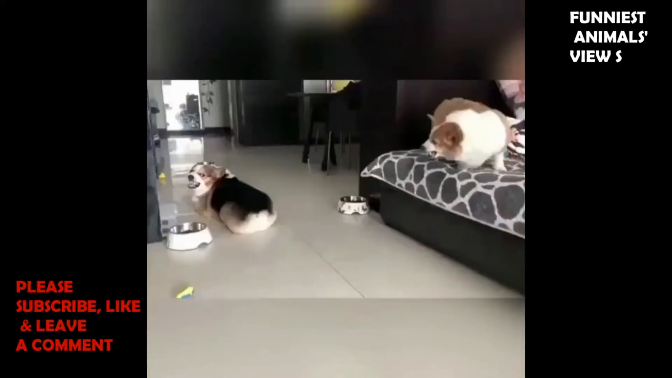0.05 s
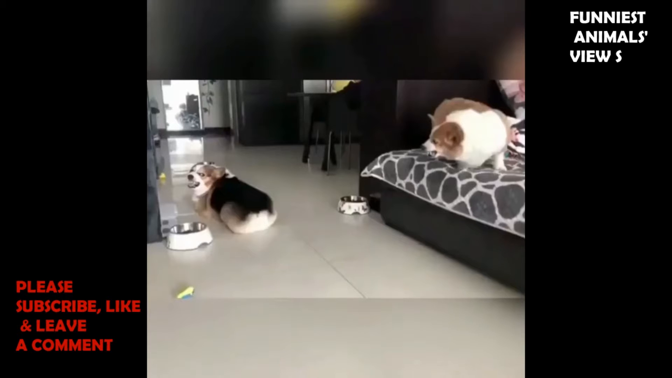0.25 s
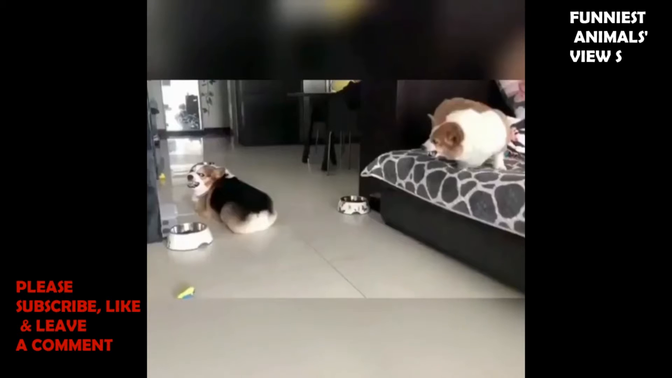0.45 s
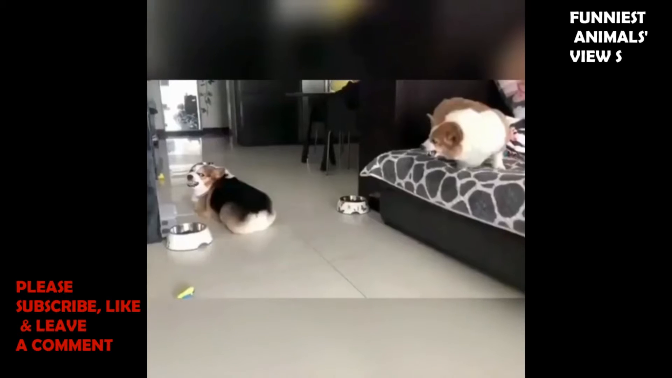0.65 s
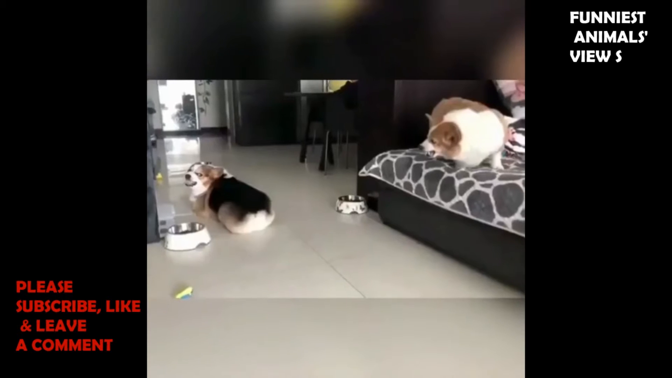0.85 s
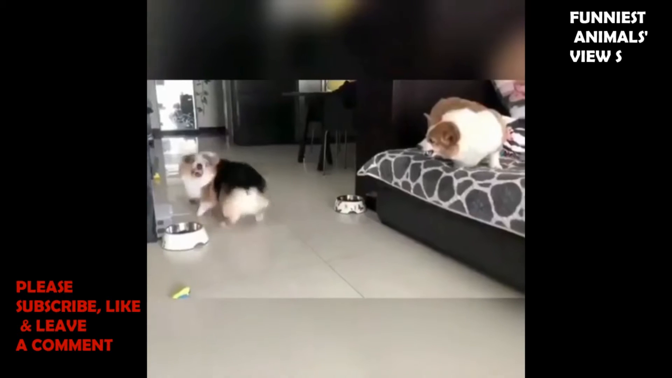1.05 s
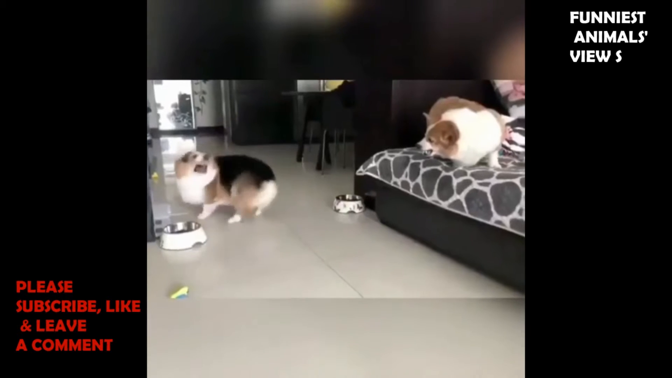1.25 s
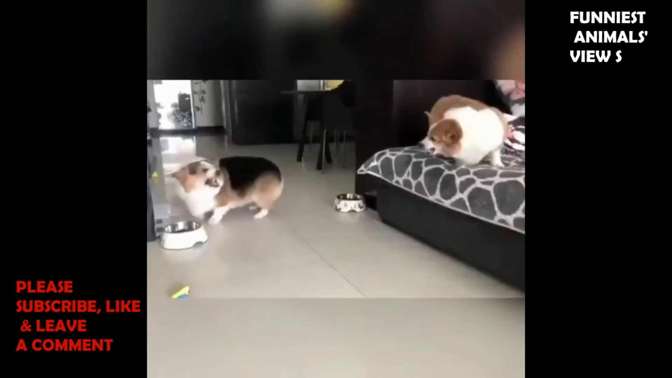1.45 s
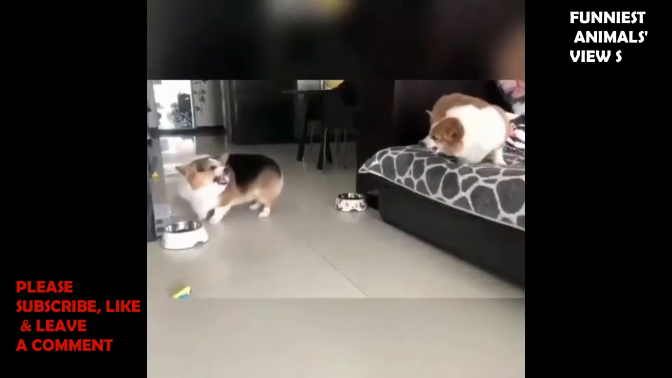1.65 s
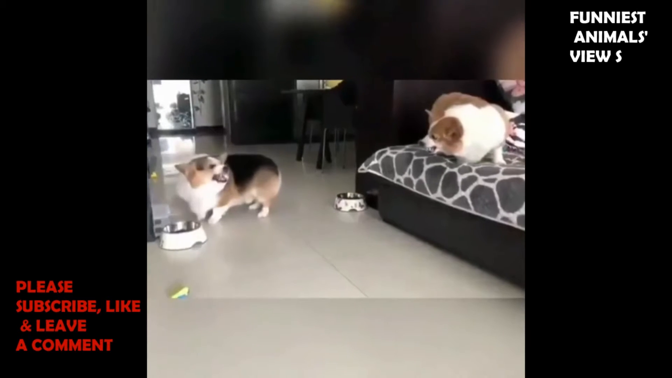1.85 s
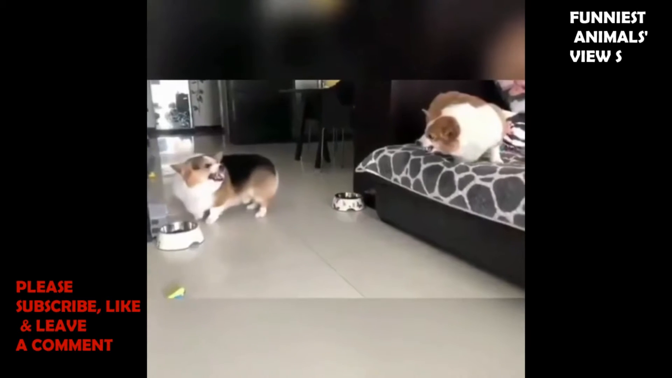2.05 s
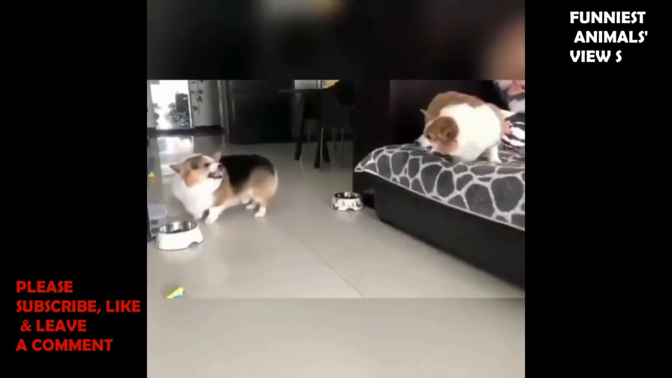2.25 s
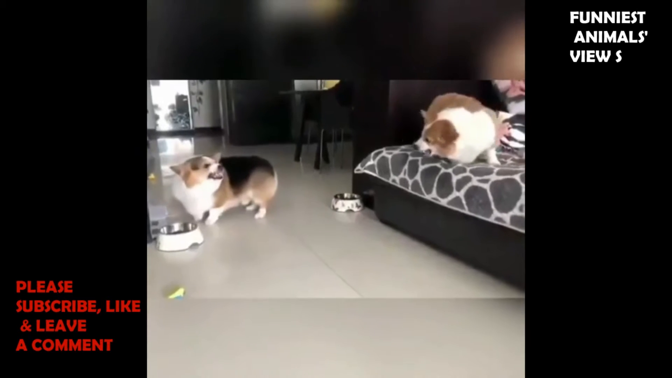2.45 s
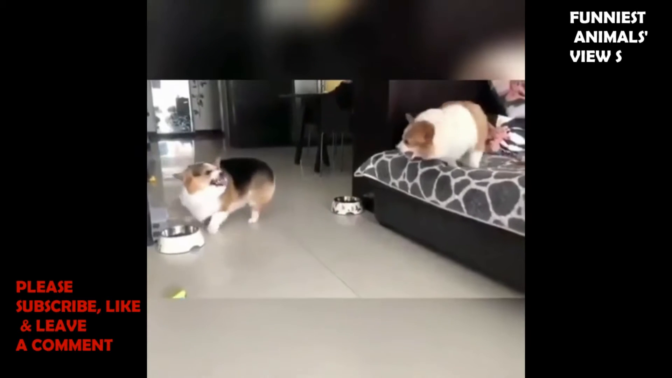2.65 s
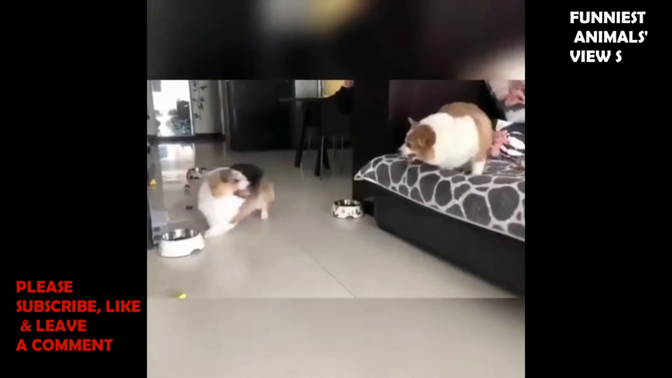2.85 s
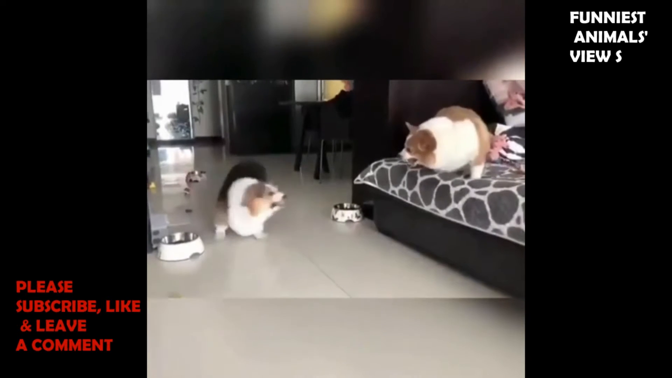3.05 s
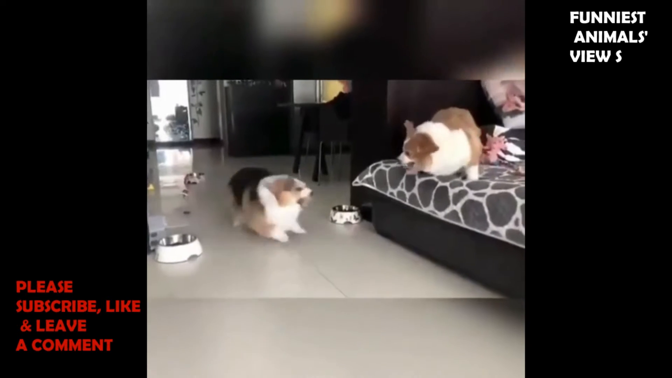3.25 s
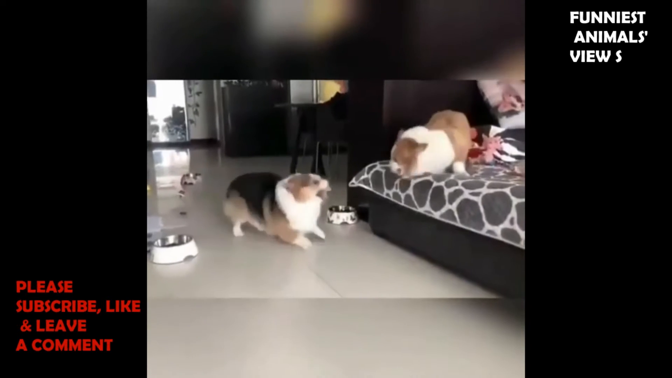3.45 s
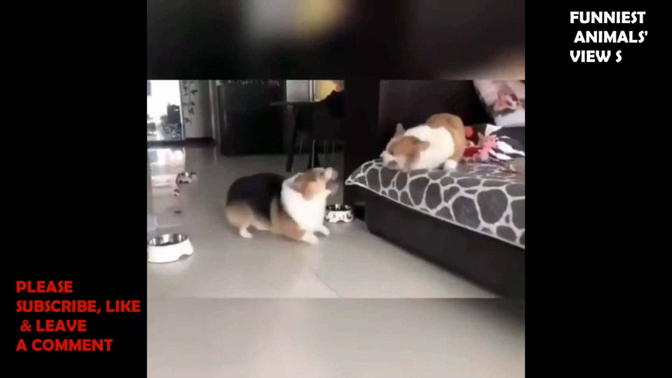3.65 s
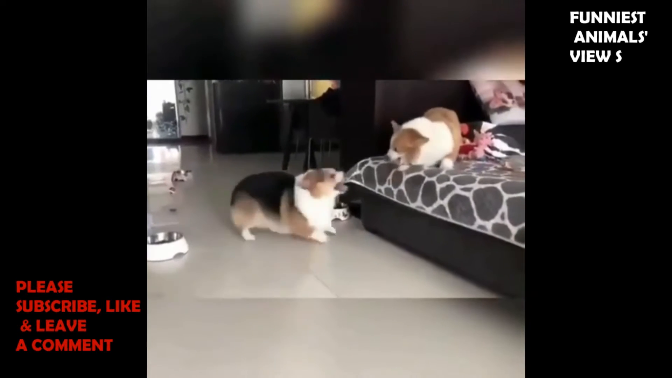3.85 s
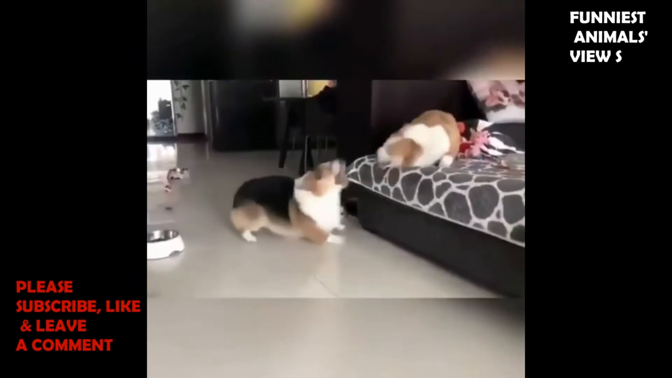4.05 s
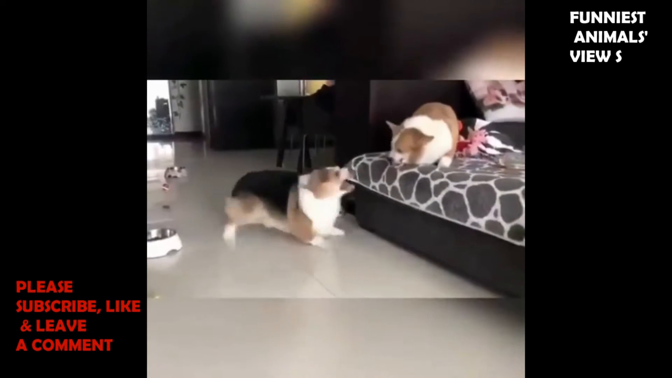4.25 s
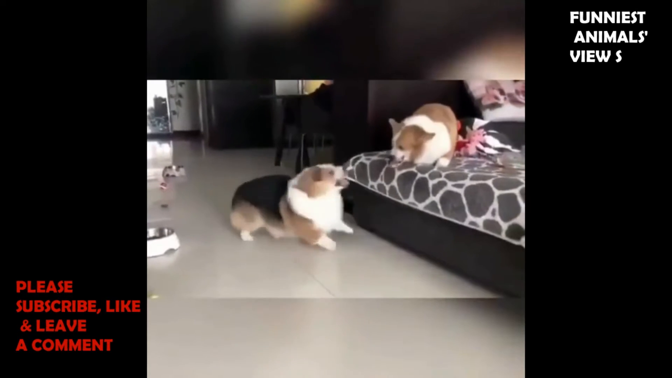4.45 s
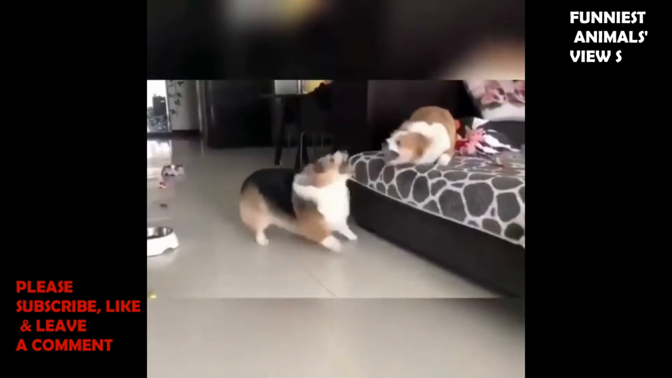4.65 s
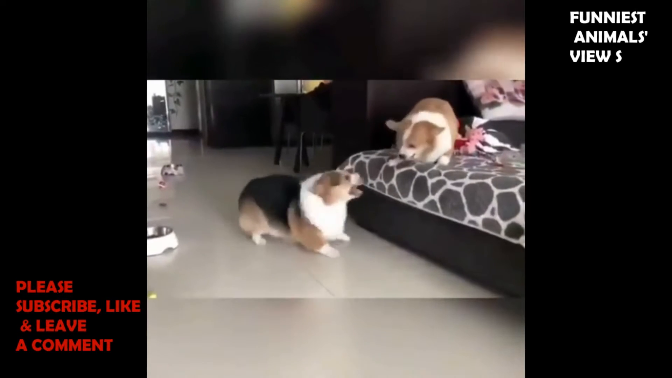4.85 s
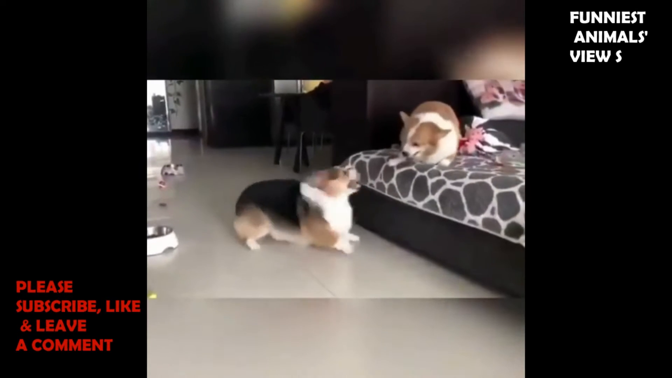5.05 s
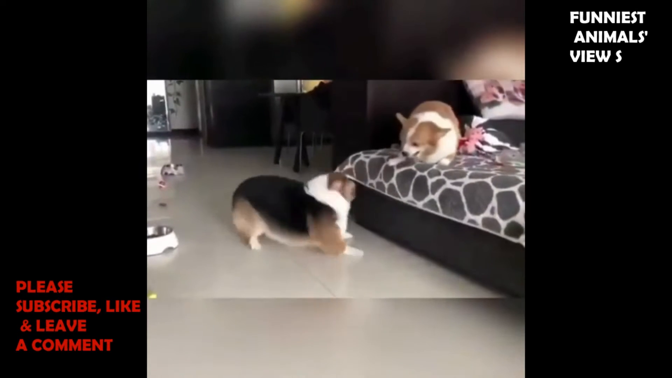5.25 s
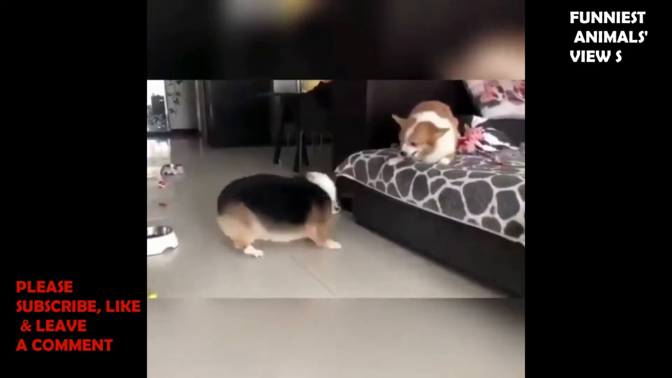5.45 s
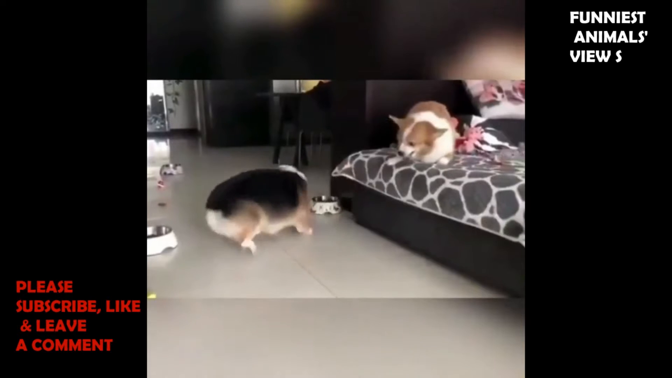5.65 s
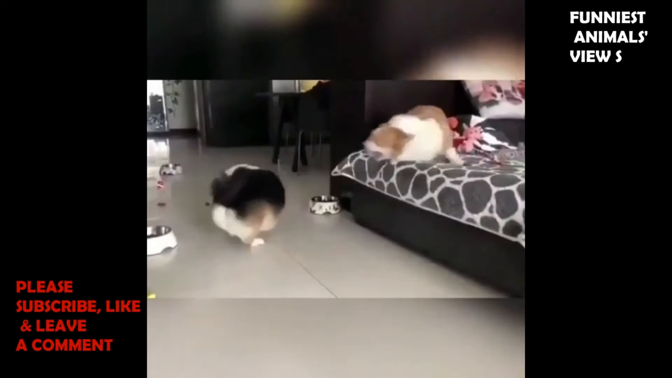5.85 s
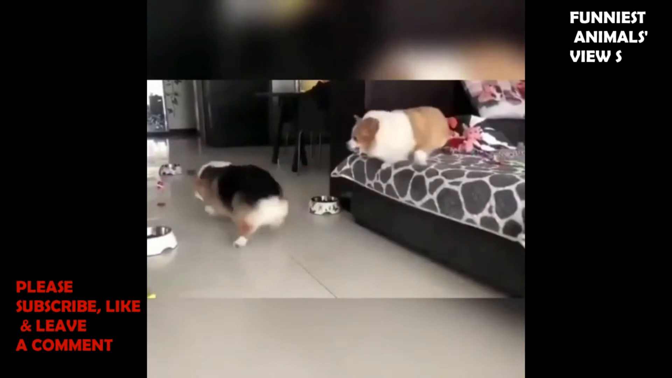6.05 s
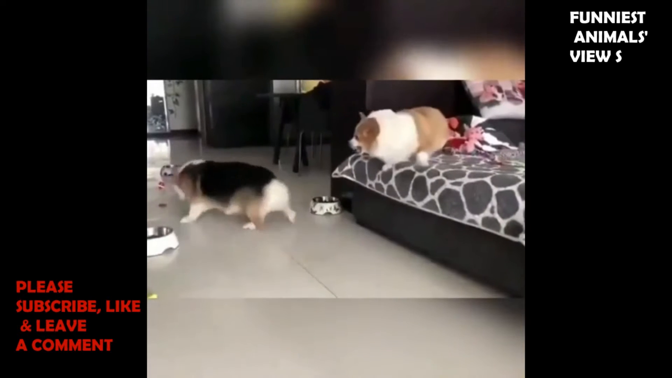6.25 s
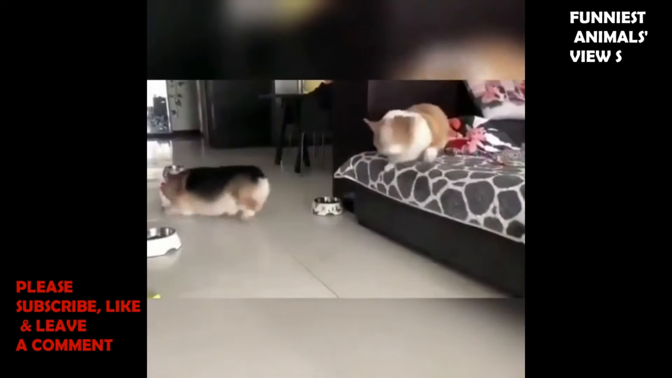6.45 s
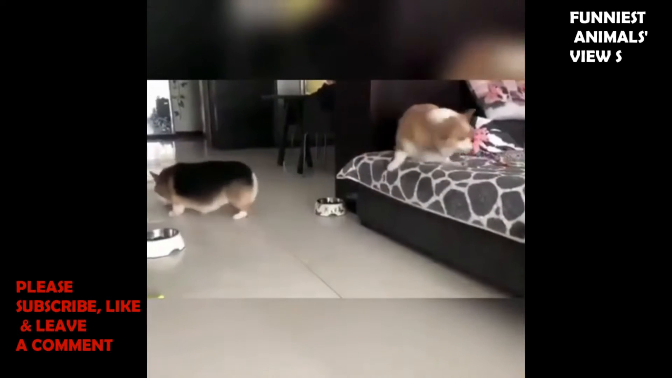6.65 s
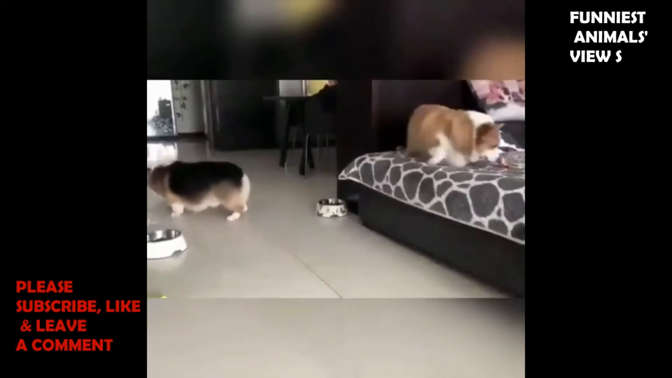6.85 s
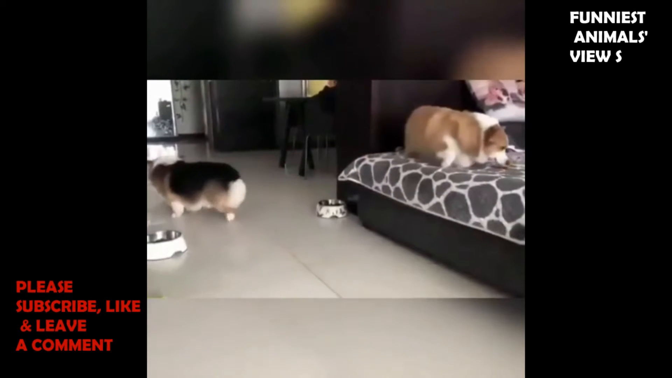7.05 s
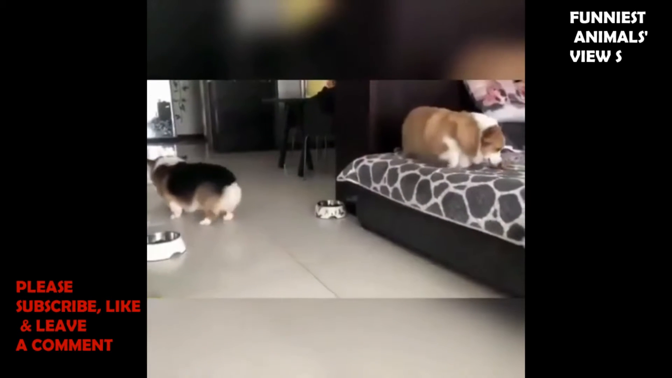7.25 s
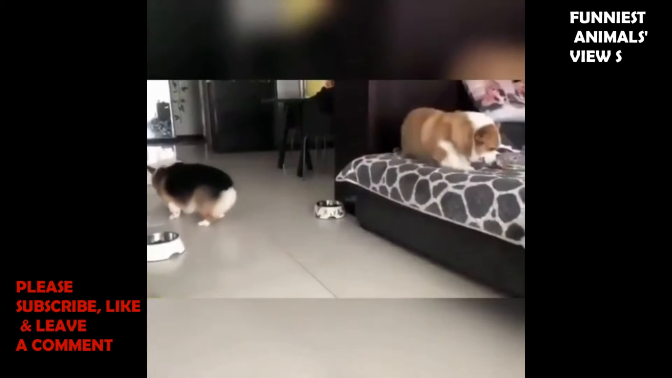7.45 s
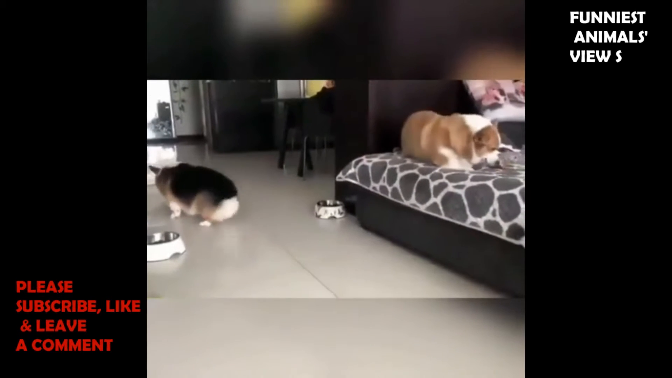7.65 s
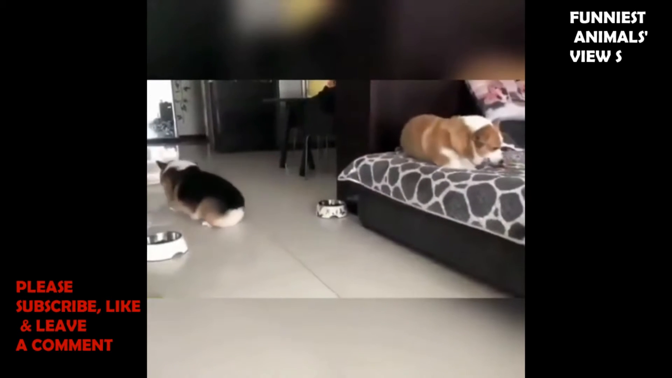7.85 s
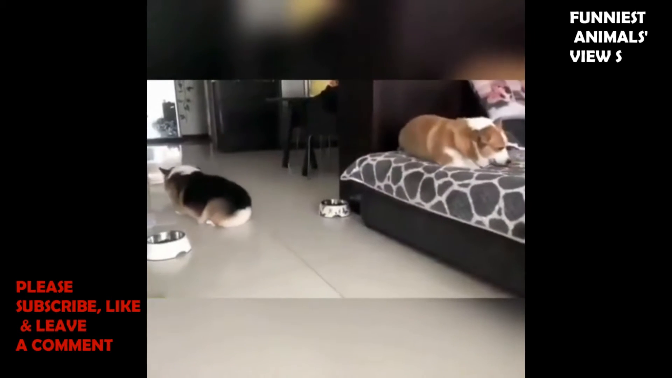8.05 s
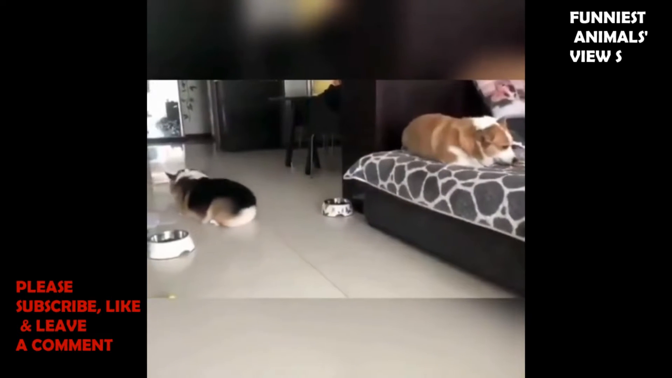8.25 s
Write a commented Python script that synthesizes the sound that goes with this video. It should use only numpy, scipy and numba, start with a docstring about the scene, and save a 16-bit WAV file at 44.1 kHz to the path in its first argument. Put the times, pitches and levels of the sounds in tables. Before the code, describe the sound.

After a low, rattling growl, two corgi-sized dogs quarrel with hoarse barks and snaps, claws scrabbling on tiles in a hard, echoing room.

```python
"""Two corgis quarrel in a hard tiled room: after a short silence, a low growl of slow flaps runs on until
about 7 s, over quiet air with a faint hum. From 1.15 s ten hoarse barks and snaps burst out: rough fold pulses
ringing through throat resonances. Huffs and rasps are resonant noise; grainy paw scuffs and claw ticks
thicken from 3.15 s. Two soft woofs follow, the last at 7.1 s. Reflections and a tail set each source in the room.
At the microphone the treble differs between left and right, and the phone's limiter holds the barks down."""
import sys
import numpy as np
from scipy import signal
from scipy.fft import rfft, irfft, next_fast_len
from scipy.io import wavfile
from scipy.ndimage import uniform_filter1d, minimum_filter1d
from numba import njit

SR = 44100
rng = np.random.default_rng(int(sys.argv[2]) if len(sys.argv) > 2 else 0)


def wrap_up_sound(samples):
    """Save the sound to the file named by the first command line argument, as 16-bit audio."""
    columns = np.atleast_2d(samples).T
    # keep every value between -1 and 1, then stretch to whole-number steps
    tamed = np.clip(columns, -1, 1)
    steps = np.round(tamed * 32767).astype(np.int16)
    wavfile.write(sys.argv[1], SR, steps)


N = 366471
TIME = np.arange(N) / SR


def undb(db):
    """Decibels to gain."""
    return 10 ** (np.asarray(db) / 20)


def unit(x):
    """Scale to rms 1."""
    return x / np.sqrt(np.mean(x ** 2))


def even(x, span_s):
    """Hold the rms near 1 over span_s, keeping the faster grain."""
    size = max(int(span_s * SR), 8)
    power = uniform_filter1d(uniform_filter1d(x ** 2, size), size)
    return x / np.sqrt(np.abs(power) + 1e-14)


def curves(rows, t):
    """The columns of a table at times t, drawn as straight lines from row to row."""
    s, *columns = np.transpose(rows)
    return [np.interp(t, s, c) for c in columns]


def wobble(n, rate_hz):
    """Smooth random motion of spread near 1, with rate_hz new targets a second."""
    at = np.arange(n) * rate_hz / SR
    return 1.2 * np.interp(at, np.arange(n), rng.standard_normal(n))


def swell(t, length_s, attack_s, release_s, fade_db):
    """Attack, a hold that fades by about fade_db, release."""
    rise = np.sin(np.pi / 2 * np.clip(t / attack_s, 0, 1)) ** 2
    fall = np.clip((length_s - t) / release_s, 0, 1)
    return rise * fall * undb(-fade_db * np.clip((t - attack_s) / length_s, 0, 1))


def colour(x, points):
    """Shape a sound by (Hz, dB) points; rms 1."""
    hz, db = np.transpose(points)
    size = next_fast_len(len(x))
    f = np.maximum(np.fft.rfftfreq(size, 1 / SR), 1)
    gain = undb(np.interp(np.log(f), np.log(hz), db))
    return unit(irfft(rfft(x, size) * gain, size)[:len(x)])


@njit
def svf(x, hz, width):
    """State-variable band-pass with moving centre and width."""
    y, b, l = np.empty(len(x)), 0., 0.
    for i in range(len(x)):
        g, k = np.tan(np.pi * hz[i] / SR), width[i] / hz[i]
        v = (b + g * (x[i] - l) + 1e-18) / (1 + g * (g + k))
        b, l, y[i] = 2 * v - b, l + 2 * g * v, k * v
    return y


def resonate(x, hz, width):
    """A steep resonance: the band-pass twice."""
    hz, width = hz * np.ones(len(x)), width * np.ones(len(x))
    return svf(svf(x, hz, width), hz, width)


def add(out, s, x):
    """Mix x into out from time s."""
    i = int(s * SR)
    out[i:i + len(x)] += x[:N - i]


# bands that waver in hisses and scuffs: centre_hz
TREBLE_BANDS = (3500, 6500, 10500)


def restless(x, drift_db=2.5, rate_hz=25):
    """Let the treble bands of a scrape or hiss rise and fall on their own."""
    drifts = [resonate(x, hz, hz / 2) * (undb(drift_db * wobble(len(x), rate_hz)) - 1) for hz in TREBLE_BANDS]
    return x + sum(drifts)


# decay of the tiled room: band_hz, time_to_fall_60_db_s
ROOM_DECAY = [(150, 0.57), (500, 0.53), (1400, 0.49), (3700, 0.62), (10000, 0.37)]


def room(x, wet_db, early_db=-6, early_s=0.0062, build_s=0.0096):
    """Direct sound, quick reflections off floor and walls, and a diffuse tail; more wet_db sits deeper."""
    t = TIME[:SR]
    f, s, bins = signal.stft(rng.standard_normal(SR), SR, nperseg=256)
    hz, t60 = np.transpose(ROOM_DECAY)
    t60_at_f = np.interp(np.log(f + 1), np.log(hz), t60)[:, None]
    decay = np.exp(-np.log(1000) * s / t60_at_f)
    tail = signal.istft(bins * decay)[1][:SR] * (1 - np.exp(-t / build_s))
    early = rng.standard_normal(SR) * (rng.random(SR) < .02) * np.exp(-t / early_s)
    response = (undb(wet_db) * unit(tail) + undb(early_db) * unit(early)) / np.sqrt(SR)
    response[0] += 1  # direct sound
    return signal.fftconvolve(x, response / np.linalg.norm(response))[:N]  # response keeps unit energy


# spectrum of the room air: band_hz, gain_db
AIR_COLOUR = [(30, -16.5), (65, 3.5), (110, -2), (160, -3), (260, 0.5), (400, -7), (800, -11.5),
              (1300, -11), (2000, -19), (4000, -29), (8000, -35.5), (13000, -43)]
# steady hum tones: pitch_hz, level_db
HUM_TONES = [(60, -68), (100, -70), (276, -68)]
AIR_DB = -54


def background():
    """Quiet room air, shaped noise whose level drifts slightly, with a faint hum of steady sines."""
    hum = sum(undb(db) * unit(np.sin(2 * np.pi * hz * TIME)) for hz, db in HUM_TONES)
    air = colour(rng.standard_normal(N), AIR_COLOUR)
    return air * undb(AIR_DB + wobble(N, 7.8)) + hum


# paws scuffing on the tiles: start_s, length_s, level_db
PAW_SCUFFS = [(.3, .12, -67), (.68, 0.8, -60.5), (1.917, 0.12, -62), (2.265, .07, -64.5),
              (3.18, 0.19, -47.5), (3.443, 0.17, -41), (3.566, 0.28, -41), (3.843, 0.16, -52.5),
              (3.957, 0.05, -30), (4.07, 0.14, -37.5), (4.234, 0.15, -39), (4.381, 0.24, -41),
              (4.645, 0.25, -44.5), (4.805, 0.18, -37.5), (5.065, 0.18, -42.5), (5.226, 0.13, -43.5),
              (5.432, 0.15, -50.5), (5.608, 0.2, -44.5), (5.704, 0.23, -47), (6.015, 0.09, -33.5),
              (6.12, 0.19, -39.5), (6.367, 0.092, -50.5), (6.617, 0.14, -43.5), (7.07, 0.19, -48.5)]
# single claw ticks: start_s, level_db (at the onset)
CLAW_TICKS = [(3.694, -27), (4.49, -25.5), (4.5744, -39.5), (5.097, -26.5), (5.308, -26), (5.512, -32),
              (5.9409, -36.5), (6.3748, -34.5), (6.5105, -31)]
# spectrum of scuffs and ticks: band_hz, gain_db
TILE_COLOUR = [(1500, -14.5), (3500, 6.5), (5500, 2), (8000, -1), (11000, -4.5), (13000, -7.5)]
# light footwork between the scuffs: start_s, end_s
SHUFFLE_SPAN = (3.15, 7.0)
SHUFFLE_DB = -59.5
SCUFF_ATTACK_S, SCUFF_RELEASE_S, SCUFF_FADE_DB = 0.017, 0.05, 5.5


def paws(grain_db=3.5, uneven_db=0.5, tick_s=0.0026):
    """Pads and claws drag unevenly over the tiles in fine grains; single claws tick."""
    drag = undb(SHUFFLE_DB) * (TIME > SHUFFLE_SPAN[0]) * (TIME < SHUFFLE_SPAN[1])
    for s, length, db in PAW_SCUFFS:
        scuff = swell(TIME[:SR // 2], length, SCUFF_ATTACK_S, SCUFF_RELEASE_S, SCUFF_FADE_DB)
        add(drag, s, undb(db) * scuff)
    grain = undb(grain_db * wobble(N, 700) + uneven_db * wobble(N, 60))
    grit = colour(rng.standard_normal(N) * grain, TILE_COLOUR)
    out = restless(grit) * drag
    t = TIME[:SR // 20]
    for s, db in CLAW_TICKS:
        tick = colour(rng.standard_normal(len(t)), TILE_COLOUR) * np.exp(-t / tick_s)
        add(out, s, undb(db) * tick)
    return out


# course of one continuous growl, also under the barks:
# time_s, chest_level_db, mouth_level_db, mouth_resonance_hz
GROWL_COURSE = [
    [(0.13, -40, -46, 725), (0.786, -37, -48, 700), (1.08, -40.5, -45, 730)],
    [(1.92, -48, -50, 920), (2.362, -44.5, -52, 800), (2.63, -44.5, -44.5, 910)],
    [(3.32, -43.5, -38, 644), (3.37, -47, -37.5, 830), (3.44, -42.5, -37.5, 865)],
    [(4.45, -36.5, -31, 734), (4.6, -34.5, -35.5, 690), (4.65, -45, -33, 710)],
    [(5.05, -42, -36.5, 932), (5.19, -34, -38, 698), (5.96, -42.5, -45.5, 860)],
    [(6.45, -48.5, -51, 830), (6.768, -42, -47.5, 888), (7.0, -80, -84.5, 820)],
]
# it moves from throat into nose and back: time_s, throat_over_chest_db, nose_over_mouth_db
GROWL_SEAT = [(1.1, -6.5, -21), (1.8, -14, -14.5), (2.65, -25, -15.5), (3.3, -7.5, -21.5),
              (7.0, -6.5, -22.5)]
# spectrum of the chest: band_hz, gain_db
CHEST_COLOUR = [(25, -48.5), (45, -24), (75, -7), (105, -1), (150, 2), (205, 0.5), (270, -11), (420, -26),
                (600, -35.5), (1500, -69)]
# nose resonances: centre_hz
NOSE_RESONANCES = (1800, 3830)
THROAT_HZ = 267


def growl(rate_hz=23.3, ring_s=0.015, teeth_db=-17):
    """Slow flaps of the slack folds thump the chest and throat, and puff through the nose and half-open mouth."""
    chest_db, mouth_db, mouth_hz = curves(np.vstack(GROWL_COURSE), TIME)
    throat_db, nose_db = curves(GROWL_SEAT, TIME)
    cycle = np.cumsum(rate_hz * (1 + .09 * wobble(N, 20))) / SR
    flaps = np.diff(np.floor(cycle), prepend=0)  # one click a cycle
    puffs = rng.standard_normal(N) * (np.exp(-(cycle % 1) / rate_hz / ring_s) + 0.082)
    thumps = 0.85 * unit(flaps) + unit(puffs)
    throat = undb(throat_db) * unit(resonate(thumps, THROAT_HZ, 77))
    chest = even(colour(thumps, CHEST_COLOUR) + throat, 0.43)
    breathy = unit(puffs) + .5 * rng.standard_normal(N)
    mouth = even(resonate(breathy, mouth_hz, 560), 0.027)
    mouth += undb(teeth_db) * unit(resonate(breathy, 1300, 1700))
    mouth += undb(-22) * unit(resonate(breathy, 6600, 6000))
    nose = undb(nose_db) * sum(unit(resonate(breathy, hz, 500)) for hz in NOSE_RESONANCES)
    fade = np.interp(TIME, [6.9, 7.3], [1, 0])
    return fade * (chest * undb(chest_db) + (mouth + nose) * undb(mouth_db))


def rasp(length, db, hz, width, rasp_db=4.0, attack_share=.22, release_share=0.4, fade_db=3):
    """A short rasping puff: flickering noise through one mouth resonance."""
    n = int(length * SR)
    air = resonate(rng.standard_normal(SR // 2), hz, width) * undb(rasp_db * wobble(SR // 2, 180))
    envelope = swell(TIME[:n], length, attack_share * length, release_share * length, fade_db)
    return undb(db) * unit(air[:n] * envelope)


# huffs, rasps and squeaks: start_s, length_s, level_db, resonance_hz, width_hz (of each filter pass)
MOUTH_HUFFS = [(0.25, 0.2, -52.5, 2340, 2440), (0.682, 0.12, -40.5, 650, 496),
               (0.684, 0.27, -51, 1950, 910), (1.126, 0.09, -30, 385, 400), (1.433, 0.045, -21, 1260, 1100),
               (1.458, 0.021, -32, 3380, 454), (1.953, 0.037, -49, 1400, 2570),
               (2.254, 0.13, -44.5, 615, 607), (2.26, 0.12, -52, 1820, 900),
               (2.925, 0.057, -26.5, 4030, 2210), (3.445, 0.12, -30, 1440, 2196),
               (3.851, 0.011, -17.5, 1380, 802), (4.398, 0.078, -28, 1460, 1675),
               (4.405, 0.03, -32.5, 3620, 401), (4.682, 0.056, -23.5, 3260, 1400),
               (4.828, 0.11, -28, 1490, 1930), (4.884, 0.059, -24.5, 580, 1010),
               (5.066, 0.049, -36, 2320, 698), (5.091, 0.12, -32.5, 1020, 911),
               (5.158, 0.037, -34, 3130, 375), (5.244, 0.12, -38, 1730, 2530),
               (5.365, 0.056, -42, 3300, 900), (5.475, 0.092, -40, 1450, 1800),
               (5.617, 0.075, -29, 600, 600), (5.674, 0.14, -34.5, 1680, 2640),
               (5.991, 0.043, -29, 920, 400), (6.608, 0.094, -39, 1400, 2970),
               (6.735, 0.078, -43.5, 1280, 295), (7.124, .06, -53, 5540, 700)]
GRUNT_HZ, GRUNT_WIDTH_HZ, GRUNT_S = 478, 460, .075


def huffs():
    """Snarls and puffs of mouth noise, and a chesty grunt as the jaw closes on each bark."""
    out = np.zeros(N)
    for s, length, _, closes_at, *_, grunt_db in BARK_CALLS:
        add(out, s + closes_at * length, rasp(GRUNT_S, grunt_db, GRUNT_HZ, GRUNT_WIDTH_HZ))
    for s, length, db, hz, width in MOUTH_HUFFS:
        add(out, s, rasp(length, db, hz, width))
    return out


def folds(pitch, rough):
    """Unsteady pulses of the vocal folds and the air they chop; gives the sound and its phase."""
    n = len(pitch)
    rough = np.clip(rough, .22, .8)
    jitter = rough * (.11 * wobble(n, 350) + .04 * wobble(n, 90))
    phase = 2 * np.pi * np.cumsum(pitch * (1 + jitter)) / SR
    shimmer = undb(7 * rough * wobble(n, 400))
    # strong and weak cycles alternate, which adds lines halfway between the harmonics
    alternation = 1 + .5 * np.cos(phase / 2)
    pulses = unit(sum(np.cos(k * phase) for k in range(1, 7)) * alternation * shimmer)
    air = unit(resonate(rng.standard_normal(n), 1200, 5700) * (1 + 0.6 * np.cos(phase)))
    return np.sqrt(1 - rough ** 2) * pulses + rough * air, phase


# ten barks and snaps, then two soft woofs; open/closed pairs are for the jaw open, then closed:
# start_s, length_s, attack_s, jaw_closes_at (share of length), level_db, fade_db,
# roughness open/closed (share, held to 0.22-0.8), pitch_hz open/closed,
# first_resonance_hz open/closed, second_resonance_hz open/closed, second_over_first_db open/closed,
# third_resonance_hz, third_over_both_db open/closed, hiss_db (over the voice effort), grunt_db
BARK_CALLS = [ (1.150, 0.21, 0.034, 0.53, -7, 5, .68, 0.41, 857.3, 561.8, 777, 695, 1760, 1500, -3.5, -2.5, 2455, -11, -14, -14, -32),
              (1.461, 0.14, 0.016, 0.21, -7.5, 11, 0.76, 0.3, 805, 685.3, 945, 810, 1500, 1350, 15, 1, 2570, -29, -18.5, -24.5, -27.5),
              (2.69, 0.083, 0.022, 0.54, -2, 4.1, 0.54, 0.52, 1050, 718.4, 1030, 780, 1520, 1460, -17.5, 3.5, 2850, -24.5, -14.5, -21, -24),
              (2.921, .190, 0.028, 0.61, -3, 13.4, 0.44, 0.74, 785, 750.3, 695, 724, 1600, 1580, 6.5, -6, 2365, -15.5, -13.5, -19.5, -27.5),
              (3.500, 0.097, 0.017, 0.57, -8, 9, 0.49, 0.95, 1052, 1281, 1074, 1210, 1480, 1430, -10, 2, 2220, -39, -17, -21, -39.5),
              (3.874, 0.057, 0.025, .6, -2, 8, 0.62, 0.63, 720.3, 622, 1355, 1000, 1620, 1700, -5, 18.5, 3050, -15.5, -21, -21.5, -23.5),
              (4.083, 0.046, 0.017, 0.35, -11.5, 3.9, 0.64, 0.64, 697, 642, 1410, 1200, 1590, 1750, -4.5, 2, 2410, -11, -2.5, -26, -27.5),
              (4.242, 0.058, 0.014, 0.57, -11.5, 13, 0.44, 0.81, 1019, 706, 1010, 930, 1620, 1580, -6, 2, 2170, -30.5, -10, -21.5, -27.5),
              (4.684, 0.12, 0.008, .45, -4.5, 7, .8, 0.47, 679.5, 911, 1080, 930, 1400, 1790, 6.5, 1.5, 2037, -10.5, -1.5, -23, -24),
              (6.032, 0.16, 0.048, 0.51, -0.5, 17.3, 0.57, 0.56, 1067, 750, 970, 760, 1500, 1480, -12, 7.5, 2270, -22, -11.5, -20.5, -38),
              (6.562, 0.024, 0.0078, .5, -37.5, 3, 0.38, 0.29, 433, 442, 863, 867, 1300, 1320, 5, 8, 1760, -18, -18, -28, -75),
              (7.102, 0.075, 0.02, 0.16, -31, 5.4, .3, 0.27, 247.6, 261.8, 480, 487, 1220, 1300, 0, 11, 2900, -34, -9.5, -10, -46.5),
              ]
# spectrum of the mouth hiss: band_hz, gain_db
HISS_COLOUR = [(25, -20), (80, -2), (250, 3), (480, 10), (800, 3.5), (2500, -9), (3100, -7), (4200, -3),
               (5200, -5), (7000, -5.5), (13000, -12.5)]
RELEASE_S = 0.017
LEAD_S, LEAD_DB = .03, -22  # the voice starts softly before the bark bursts out
FIRST_WIDTH_HZ = 637
JAW_TURN = .1  # time scale of the jaw's closing, as a share of a bark's length
BITE_DB, BITE_S = 2.5, 0.0066  # the pent-up air overshoots at the end of the attack: height and half-width


def bark(row, flutter_db=3.5, second_width_hz=700, third_width_hz=700, hiss_fall_db=42):
    """The folds ring three throat resonances; pitch and the lower two slide as the jaw closes; gives voice, hiss."""
    (_, length, attack, closes_at, level_db, fade_db, rough_a, rough_b, pitch_a, pitch_b, hz1_a, hz1_b,
     hz2_a, hz2_b, second_a, second_b, hz3, third_a, third_b, hiss_db, _) = row
    t = TIME[:SR // 3] - LEAD_S
    closing = (1 + np.tanh((t / length - closes_at) / JAW_TURN / 2)) / 2

    def jaw(opened, closed):
        """Slide from the open to the closed value."""
        return opened + (closed - opened) * closing

    source, phase = folds(jaw(pitch_a, pitch_b), jaw(rough_a, rough_b))
    second = undb(jaw(second_a, second_b))
    first = 1 / np.hypot(1, second)  # the first two together keep their power
    throat = [(jaw(hz1_a, hz1_b), FIRST_WIDTH_HZ, first),
              (jaw(hz2_a, hz2_b), second_width_hz, first * second),
              (hz3, third_width_hz, undb(jaw(third_a, third_b)))]
    voice = 0
    for hz, width, gain in throat:
        ringing = resonate(resonate(source, hz, 2 * width), hz, width)
        voice = voice + gain * even(ringing, .012)
    lead = undb(LEAD_DB) * np.interp(t, [-LEAD_S, 0, attack], [0, 1, 0])
    bite = undb(BITE_DB * np.exp(-((t - attack) / BITE_S) ** 2))
    effort = undb(level_db) * (lead + swell(t, length, attack, RELEASE_S, fade_db))
    # the air rushes hardest as the mouth opens, then falls by hiss_fall_db a second; the folds chop it
    chopped = rng.standard_normal(len(t)) * (1 + 0.75 * np.cos(phase))
    hiss = colour(chopped, HISS_COLOUR) * undb(hiss_db - hiss_fall_db * t)
    shudder = undb(flutter_db * wobble(len(t), 130))  # from loose tissue
    return voice * effort * bite * shudder, restless(hiss) * effort


# treble that differs between left and right: band_hz, gain_db
SIDE_TREBLE = [(2800, -80.5), (4000, -9.5), (8000, -1.5), (13000, -16.5)]


def scene():
    """Both dogs in the room, each layer with its own share of reflections; left and right differ in treble."""
    voices, hisses = np.zeros(N), np.zeros(N)
    for row in BARK_CALLS:
        voice, hiss = bark(row)
        add(voices, row[0] - LEAD_S, voice)
        add(hisses, row[0] - LEAD_S, hiss)
    mid = room(voices, wet_db=-8)
    mid += room(hisses + huffs(), wet_db=-2.5)
    mid += room(growl(), wet_db=0.5, early_db=-6.5)
    mid += room(paws(), wet_db=-6, early_db=1)
    mid += background()
    # scattered treble reaches the two sides unrelated
    treble = signal.sosfilt(signal.butter(10, 3900, "high", fs=SR, output="sos"), mid)
    envelope = np.sqrt(np.abs(uniform_filter1d(treble ** 2, size=SR // 200)))
    side = undb(-7.5) * envelope * colour(rng.standard_normal(N), SIDE_TREBLE)
    return np.array([mid + side, mid - side])


TOP_HZ = 13150
START_S = .119  # silence until here


def record(dry):
    """The phone's fast look-ahead limiter, then the treble cut-off."""
    ceiling, size = .92, int(.007 * SR)
    gain = np.minimum(1, ceiling / (np.abs(dry).max(axis=0) + 1e-9))
    gain = uniform_filter1d(minimum_filter1d(gain, size), size)
    limited = dry * gain * (TIME > START_S)
    return signal.sosfilt(signal.ellip(10, .2, 80, TOP_HZ, fs=SR, output="sos"), limited)


dry = scene()
out = record(dry)
wrap_up_sound(out)
```